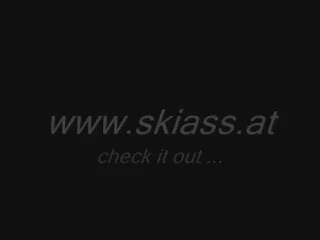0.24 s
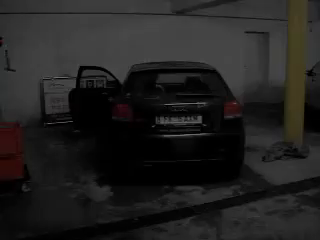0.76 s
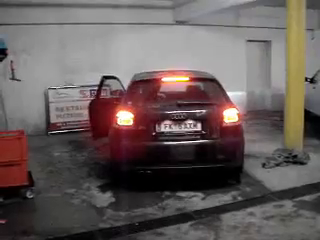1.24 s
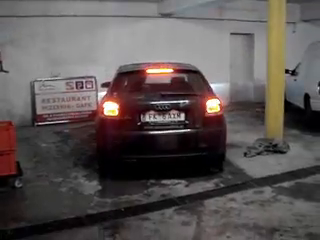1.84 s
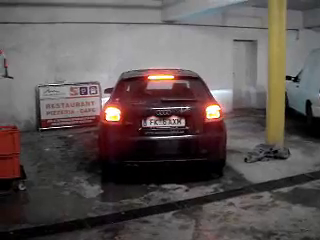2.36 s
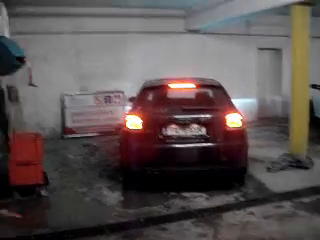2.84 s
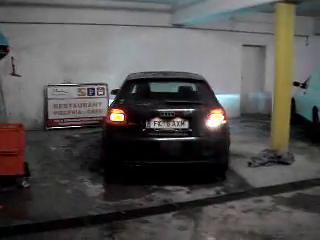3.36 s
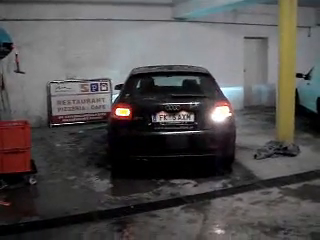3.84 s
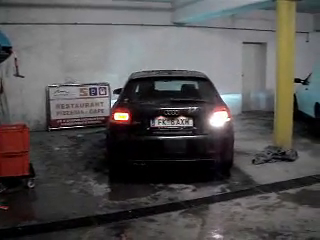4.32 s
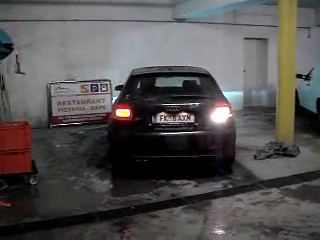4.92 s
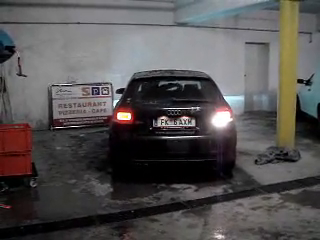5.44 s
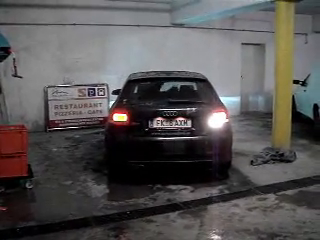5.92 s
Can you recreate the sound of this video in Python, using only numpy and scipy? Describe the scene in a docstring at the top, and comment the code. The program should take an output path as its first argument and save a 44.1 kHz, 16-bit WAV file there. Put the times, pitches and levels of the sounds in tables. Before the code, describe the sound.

After a brief silence, a mains-driven pump buzzes and hisses in an echoing concrete wash bay. A car door slams heavily, the starter whirs for a moment and the engine catches with a roar, settling into a low, booming idle. The pump turns brighter and tighter as its valve shuts. The engine sags with a dull thud, then picks up as the pump clicks off and fades. One rough microphone a few metres behind the car.

```python
"""A mains-driven pump buzzes and hisses in an underground wash bay until it clicks off.
A car door slams; the engine cranks, catches with a roar and idles, then sags with a thud as the clutch
bites and picks up again. The pump is noise and a mains comb through housing resonances; the engine is
overtones and throbbing noise locked to its firings. The exhaust booms in a low mode of the concrete
garage, the blows are bursts of panel noise with a garage tail, and the clicks are short bands of noise."""
import sys
import numpy as np
from scipy import signal
from scipy.fft import rfft, irfft
from scipy.io import wavfile

SR = 44100
rng = np.random.default_rng(int(sys.argv[2]) if len(sys.argv) > 2 else 0)


def digitize_waveform(pressure):
    """Quantize a signal to 16-bit integers and store it at the path in sys.argv[1].

    Rows of a 2-D input are taken as channels; values are limited to [-1, 1].
    """
    field = np.atleast_2d(pressure).T
    bounded = np.clip(field, -1, 1)
    quanta = np.round(bounded * 32767).astype(np.int16)
    wavfile.write(sys.argv[1], SR, quanta)


N = 272538
TIME = np.arange(N) / SR
FREQS = np.maximum(np.arange(N // 2 + 1) * SR / N, 1)

# engine speed: time_s, firing_rate_hz
ENGINE_SPEED = [(2.3, 30.76), (2.45, 44.7), (2.6, 44.94), (2.75, 38.15), (2.95, 41.3), (3.2, 39.48),
                (3.45, 36.29), (3.7, 35.34), (4.0, 34.86), (4.3, 32.58), (4.6, 29.96), (4.95, 28.86),
                (5.3, 29.48), (5.5, 34.53), (5.7, 37.88), (6.18, 38.76)]
# engine load, heard as the level of the rumble and overtones: time_s, level_db
ENGINE_LOAD = [(2.3, -28), (2.5, -27.5), (3.42, -27.5), (4.0, -30.5), (4.35, -28.5), (4.8, -34.5),
               (5.25, -28.5), (5.8, -23.5), (6.18, -24)]
# exhaust pipe and garage, through which the overtones glide: pitch_hz, level_db (relative to load)
EXHAUST_RESPONSE = [(58, -4.5), (69, -1.5), (74, -14.5), (82, -21), (104, -16), (118, -4), (138, -12.5),
                    (155, -8), (182, -9.5), (205, -16), (228, -2.5), (270, -22), (330, -5.5)]
# spectrum of cranking, roar and intake hiss: pitch_hz, density_db (per Hz, relative)
START_UP_COLOUR = [(24, -31), (40, 2), (62, 1.5), (151, -32), (450, -16), (573, -10), (748, -5), (2170, -2),
                   (3270, -4), (3520, -7), (4070, -8), (8410, -19), (13000, -36)]
# spectrum of the engine rumble: pitch_hz, density_db (per Hz, relative)
ENGINE_RUMBLE_COLOUR = [(25, -22), (45, -1), (90, -4), (160, -7), (300, -3.5), (600, -8), (1250, -7),
                        (1550, -13.5), (2100, -13.5), (3800, -21.5), (6000, -33.5), (13000, -37.5)]
EXHAUST_DB_PER_ORDER = -0.56
# below this firing rate the engine labours: its firing pulses weaken a lot, its overtones gently
LABOUR_BELOW_HZ, PULSE_LABOUR_DB_PER_HZ, OVERTONE_LABOUR_DB_PER_HZ = 34.9, 5, 1.1
PULSE_DB = -30.5
CRANK_S, CRANK_ATTACK_S, CRANK_DB = 1.95, 0.09, -19.5
CATCH_S, CATCH_ATTACK_S, CATCH_T60_S, CATCH_DB = 2.27, 0.044, 1.0, -12
INTAKE_DB, INTAKE_T60_S, THROTTLE_SHUT_S, THROTTLE_CLOSING_S = -22, 5.5, 3, 0.071
# low mode of the garage: pitch, decay, gain over the direct sound, lag
ROOM_MODE_HZ, ROOM_MODE_T60_S, ROOM_MODE_DB, ROOM_MODE_LAG_S = 38.95, 4.64, 19.4, 0.0036

# blows on door and drivetrain:
# start_s, level_db (at 500 Hz, before body colour), tilt_db_per_octave, shake_t60_s, echo_db (re blow)
BLOWS = [(1.858, -25, 3.5, 0.37, 6.5), (1.885, -9, -0.9, 0.36, -1), (1.91, -5, -5, 0.12, -4.5),
         (1.982, -31, 6, 0.1, -6), (2.072, -26, 4, 0.19, -0.5), (3.301, -16, 1, .15, -7.5),
         (4.388, -14, 1.5, 0.25, -9.5), (4.401, -14.5, -7.5, 0.16, -5), (4.488, -16.5, -4, 0.079, -6.5),
         (5.783, -20, 0, 0.34, -6)]
# broad spectrum of a body shake: pitch_hz, density_db (per Hz, relative)
BODY_COLOUR = [(40, -26), (100, -16), (125, -8), (160, -9), (200, -2.5), (300, -2), (420, -2.5), (600, -3),
               (900, -2.5), (1200, -3.5), (1450, -7), (2900, -9.5), (6500, -24.5), (13000, -38.5)]
# panel and cabin resonances that the blows excite: pitch_hz, level_db (over the broad shake)
PANEL_RESONANCES = [(155, 7), (246, 1.5), (318, 5), (355, 0), (426, 2.5), (485, 3.5), (565, 6), (687, 7),
                    (1160, 8.5)]
# decay of the garage tail: pitch_hz, t60_s
GARAGE_DECAY = [(60, 0.88), (250, 1.59), (1000, 1.7), (4000, 1.1), (12000, 3)]
BLOW_ATTACK_S, CABIN_T60_S = 0.015, 1.6

# knocks, valve and switch clicks: start_s, level_db (before chatter), centre_hz, width_octaves, t60_s
CLICK_EVENTS = [(1.349, -19, 540, 0.76, 0.066), (2.204, -13.5, 1060, 0.2, 0.059),
                (3.288, -25, 6160, 0.61, 0.082), (4.368, -15, 4200, 0.24, 0.013),
                (4.398, -16.5, 270, 0.88, 0.32), (4.555, -17.5, 610, 0.57, 0.089),
                (5.643, -28.5, 7040, 0.3, 0.27), (5.645, -32, 5380, .07, 0.9), (5.66, -33, 4530, 0.18, 1)]

# pump spectra with the valve open and shut: pitch_hz, density_db (per Hz, relative)
PUMP_OPEN_COLOUR = [(25, -32), (45, -25), (85, -14), (150, -13), (300, -10.5), (550, -10.5), (1050, -9.5),
                    (1400, -14.5), (2100, -15), (3800, -8), (4200, -12.5), (5500, -15), (8700, -18),
                    (13000, -29)]
PUMP_SHUT_COLOUR = [(100, -28), (300, -6), (550, -7), (800, -4.5), (1150, -4), (1500, -10.5), (1800, -6),
                    (2100, -9.5), (2900, -5.5), (3750, -9), (4150, -14), (5800, -22.5), (9000, -24.5),
                    (13000, -31)]
# housing resonances, valve open and shut:
# centre_hz, width_hz (nominal), level_db (rms of the resonance alone, added in power to the broad hiss)
HOUSING_OPEN = [(860, 50, -42), (1726, 150, -33.5), (2515, 180, -29.5), (2910, 120, -31.5),
                (3610, 160, -33.5), (6500, 430, -37)]
HOUSING_SHUT = [(1070, 500, -66), (2495, 72, -35.5), (3510, 160, -28.5), (6700, 200, -50.5),
                (8630, 93, -48), (11120, 350, -49.5)]
# strong pump motor tones: pitch_hz, open_db, shut_db, full_pressure_db (rms before wavering)
MOTOR_TONES = [(200.5, -45, -38, -40), (606, -39, -41, -51.5), (700, -41, -39, -34.5),
               (802, -40.5, -38, -35), (850.4, -39.5, -39, -36.5), (1000.7, -37.5, -30.5, -38)]
MAINS_HZ = 50
VALVE_S, PRESSURE_S, PRESSURE_RISE_S = 3.22, 4.8, 0.35   # mid-points of the two changes, rise time
STOP_S, PUMP_T60_S = 5.674, 1.2

# microphone colour: pitch_hz, level_db
MICROPHONE_COLOUR = [(20, 7), (35, -0.5), (7000, 0.5), (9400, 0.5), (10000, -3.5), (12800, -2)]
MICROPHONE_OPEN_S, CUTOFF_HZ = 0.61, 12700


def engine():
    """Exhaust overtones follow the firing rate and the load; rumble throbs with each firing."""
    firing_hz, = in_time(ENGINE_SPEED)
    load_db, = in_time(ENGINE_LOAD)
    phase = 2 * np.pi * np.cumsum(firing_hz) / SR
    firing = ramp(2.21, 0.23)
    # the first firings are the most uneven
    stumble = np.interp(TIME, [2.65, 2.85], [1.3, 0.08]) * drift(33)
    labour_hz = np.maximum(LABOUR_BELOW_HZ - firing_hz, 0)
    overtones = 0
    for order in (2, 3, 4, 5, 6, 8):
        level_db = load_db + at_hz(EXHAUST_RESPONSE, order * firing_hz)
        level_db = level_db + EXHAUST_DB_PER_ORDER * order - OVERTONE_LABOUR_DB_PER_HZ * labour_hz
        overtones = overtones + np.sqrt(2) * from_db(level_db) * np.sin(order * phase + stumble)
    rumble = from_db(load_db) * noise(ENGINE_RUMBLE_COLOUR) * (1 + 0.067 * np.cos(phase))
    pulse = firing * from_db(PULSE_DB - PULSE_LABOUR_DB_PER_HZ * labour_hz)
    return firing * (overtones + rumble) + boom(pulse, phase) + start_up(phase) + whine()


def boom(pulse, phase):
    """Firings swing a low garage mode: it swells when they match it and beats when the engine sags."""
    direct = pulse * np.exp(1j * phase)
    decay = from_db(-60 / (ROOM_MODE_T60_S * SR))
    pole = decay * np.exp(2j * np.pi * ROOM_MODE_HZ / SR)
    mode = signal.lfilter([1 - decay], [1, -pole], direct)
    late_mode = np.interp(TIME - ROOM_MODE_LAG_S, TIME, mode.imag)
    return np.sqrt(2) * (direct.imag + from_db(ROOM_MODE_DB) * late_mode)


def start_up(phase):
    """The starter cranks, the engine catches with a roar, and intake hiss sinks until the throttle closes."""
    catch = ramp(CATCH_S, CATCH_ATTACK_S)
    throttle_closed = ramp(THROTTLE_SHUT_S - THROTTLE_CLOSING_S, THROTTLE_CLOSING_S)
    crank = from_db(CRANK_DB) * ramp(CRANK_S, CRANK_ATTACK_S) * (1 - catch)
    roar = from_db(CATCH_DB) * catch * dying(CATCH_S, CATCH_T60_S)
    intake = from_db(INTAKE_DB) * dying(CATCH_S, INTAKE_T60_S) * (1 - throttle_closed)
    level = np.sqrt(crank ** 2 + roar ** 2 + intake ** 2)
    return level * noise(START_UP_COLOUR) * (1 + 0.14 * np.cos(phase))


def whine(hz=3462, waver=0.00385, db=-35):
    """A narrow, unsteady whine is there from the start, swells as the engine spins up, then recedes to nothing."""
    phase = 2 * np.pi * np.cumsum(hz * (1 + waver * drift(24.5))) / SR
    flutter = 1 + 0.53 * drift(39)
    swell = np.interp(TIME, [1.9, 2.35, 2.7, 3.3, 5.6, 5.85], [1, 3.5, 1.5, 1.5, 0.85, 0])
    return from_db(db) * np.sin(phase) * flutter * swell


def thuds(cabin_hz=59, cabin_db=-26):
    """Each blow shakes the body panels briefly and leaves a garage tail that decays at its own rate per band."""
    out = np.zeros(N)
    edges = 40 * 2 ** (np.arange(18) / 2)   # half-octave bands
    panels = panel_shake()
    bursts = [(ramp(s, BLOW_ATTACK_S) * dying(s, t60)) ** 2 for s, db, tilt, t60, echo_db in BLOWS]
    for low, high in zip(edges, edges[1:]):
        hz = np.sqrt(low * high)
        direct_energy, echo_feed = np.zeros(N), np.zeros(N)
        for (s, db, tilt, t60, echo_db), burst in zip(BLOWS, bursts):
            strength = from_db(db + tilt * np.log2(hz / 500)) ** 2
            direct_energy += strength * burst
            echo_feed[round(s * SR)] += strength * from_db(echo_db) ** 2
        energy_decay = from_db(-60 / (at_hz(GARAGE_DECAY, hz) * SR)) ** 2
        echo_energy = signal.lfilter([1], [1, -energy_decay], echo_feed)
        band = irfft(panels * ((FREQS >= low) & (FREQS < high)), N)
        out += band * np.sqrt(direct_energy + echo_energy)
    # the slam sets the air in the cabin humming
    slam_s = BLOWS[1][0]
    cabin = from_db(cabin_db) * dying(slam_s, CABIN_T60_S) * np.sin(2 * np.pi * cabin_hz * TIME)
    return out + cabin


def panel_shake(width_hz=14):
    """Spectrum of a random shake of the body, raised at its resonances."""
    peaks = sum((from_db(db) - 1) / (1 + ((FREQS - hz) / width_hz) ** 2) for hz, db in PANEL_RESONANCES)
    return rfft(shaped(noise(BODY_COLOUR), 1 + peaks))


def clicks(echo_db=-18.0, echo_t60=1.0, chatter_db=1.2):
    """Small parts knock or snap in one band, chatter and leave an echo."""
    out = np.zeros(N)
    for s, db, hz, octaves, t60 in CLICK_EVENTS:
        ring = shaped(rng.standard_normal(N), 1 / (1 + (np.log2(FREQS / hz) / octaves) ** 4))
        out += from_db(db) * ring * (dying(s, t60) + from_db(echo_db) * dying(s, echo_t60))
    return out * from_db(chatter_db * drift(150))


def pump(valve_travel_s=0.11):
    """Hiss and hum change colour when the valve shuts, and die away in the garage after the switch."""
    flowing = pump_state(PUMP_OPEN_COLOUR, HOUSING_OPEN, hiss_db=-25.5, buzz_db=-4.5, hum_db=-28, scatter_db=3)
    shut = pump_state(PUMP_SHUT_COLOUR, HOUSING_SHUT, hiss_db=-23.5, buzz_db=-10.5, hum_db=-29, scatter_db=1)
    valve = ramp(VALVE_S - valve_travel_s / 2, valve_travel_s)
    pressure = ramp(PRESSURE_S - PRESSURE_RISE_S / 2, PRESSURE_RISE_S)
    hum = 0
    for hz, open_db, shut_db, full_db in MOTOR_TONES:
        level_db = open_db + valve * (shut_db - open_db) + pressure * (full_db - shut_db)
        hum = hum + tone(hz, level_db)
    running = np.where(TIME < STOP_S, 1, dying(STOP_S, PUMP_T60_S))
    return running * (np.sqrt(1 - valve) * flowing + np.sqrt(valve) * shut + hum)


def pump_state(spectrum, resonances, hiss_db, buzz_db, hum_db, scatter_db):
    """Pulsing flow hiss and mains buzz excite the housing, which also rings at multiples of twice the mains."""
    flow = rng.standard_normal(N) * (1 + 0.087 * np.sin(4 * np.pi * MAINS_HZ * TIME))
    dulled_buzz = irfft(rfft(buzz()) / (1 + (FREQS / 4200) ** 4), N)
    drive = flow + from_db(buzz_db) * dulled_buzz
    power = rms_one(from_db(at_hz(spectrum, FREQS))) ** 2 * from_db(hiss_db) ** 2
    for hz, width, db in resonances:
        peak = rms_one(1 / (1 + ((FREQS - hz) / width * 0.9) ** 2))
        power = power + (from_db(db) * peak) ** 2
    out = np.sqrt(power.mean()) * shaped(drive, np.sqrt(power))
    for hz in 2 * MAINS_HZ * np.arange(16, 36):
        level_db = hum_db + scatter_db * rng.standard_normal()   # relative to the housing response
        out = out + np.sqrt(np.interp(hz, FREQS, power)) * tone(hz, level_db)
    return out


def buzz():
    """Every mains cycle rattles the pump in the same way: a dense comb of harmonics that wavers slightly."""
    size = round(SR / MAINS_HZ)
    rattle = irfft(np.exp(2j * np.pi * rng.random(size // 2 + 1)), size * 4)   # one cycle, four points a sample
    place = np.arange(N) + 2.0 * drift(1.9)   # in samples
    cycle = np.linspace(0, size, len(rattle), endpoint=False)
    return rms_one(np.interp(place, cycle, rattle, period=size))


def tone(hz, db, waver_db=2.5):
    """A sine of steady pitch whose level wavers."""
    level = np.sqrt(2) * from_db(db + waver_db * drift(4.7))
    return level * np.sin(2 * np.pi * (hz * TIME + rng.random()))


def noise(spectrum):
    """Noise with a given spectrum; rms 1."""
    return shaped(rng.standard_normal(N), from_db(at_hz(spectrum, FREQS)))


def drift(rate_hz):
    """Slow chance with spread 1, its movement limited to about the given rate."""
    return shaped(rng.standard_normal(N), 1 / (1 + (FREQS / rate_hz) ** 4))


def shaped(x, gain):
    """Filter by a gain per frequency; rms 1."""
    return rms_one(irfft(rfft(x) * gain, N))


def dying(start, t60):
    """A unit step that dies away by 60 dB in t60 seconds."""
    return (TIME >= start) * from_db(-60 * np.clip((TIME - start) / t60, 0, 3))


def ramp(start, length):
    """A straight rise from 0 to 1."""
    return np.clip((TIME - start) / length, 0, 1)


def in_time(rows):
    """The columns of a curve at every sample."""
    s, *columns = np.transpose(rows)
    return [np.interp(TIME, s, c) for c in columns]


def at_hz(points, hz):
    """Read a table on a log-frequency axis."""
    table_hz, values = np.transpose(points)
    return np.interp(np.log(hz), np.log(table_hz), values)


def from_db(db):
    """Decibels to gain."""
    return 10 ** (np.asarray(db) / 20)


def rms_one(x):
    """Scale to rms 1."""
    return x / np.sqrt(np.mean(x ** 2) + 1e-20)


def scene():
    """All sources at one microphone."""
    return (engine() + thuds() + clicks() + pump())[None]


def record(dry):
    """The microphone colours the sound and opens, peaks are rounded, the top is cut."""
    coloured = irfft(rfft(dry) * from_db(at_hz(MICROPHONE_COLOUR, FREQS)), N)
    live = coloured * ramp(MICROPHONE_OPEN_S, 0.0061)
    rounded = 1.15 * np.tanh(live / 1.15)
    top_cut = signal.ellip(12, 0.1, 80, CUTOFF_HZ, fs=SR, output="sos")
    return signal.sosfilt(top_cut, rounded)


dry = scene()
out = record(dry)
digitize_waveform(out)
```